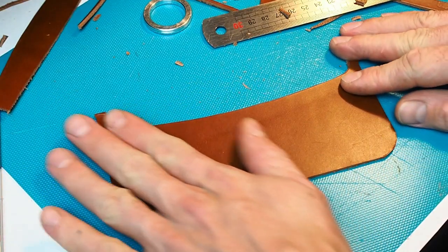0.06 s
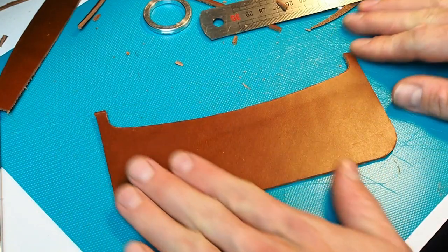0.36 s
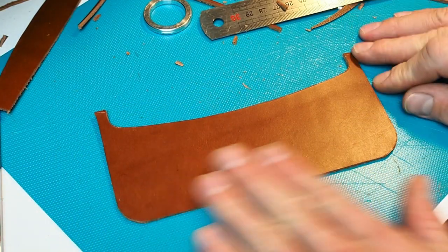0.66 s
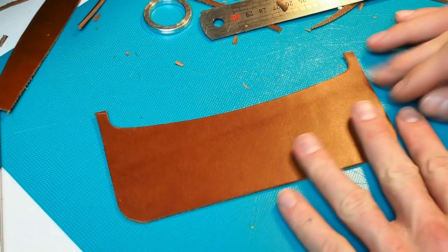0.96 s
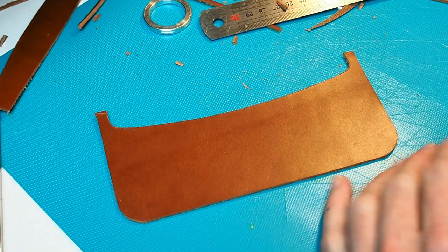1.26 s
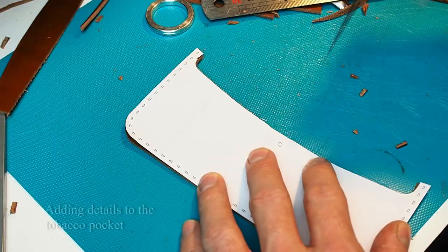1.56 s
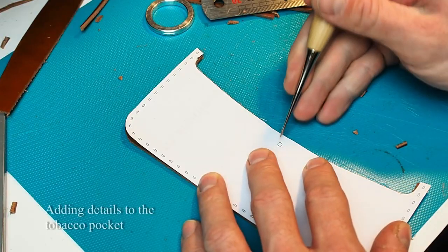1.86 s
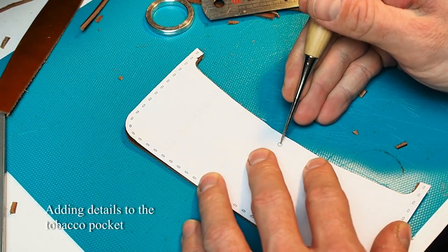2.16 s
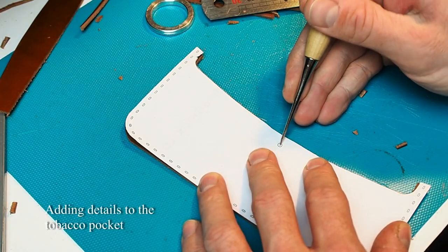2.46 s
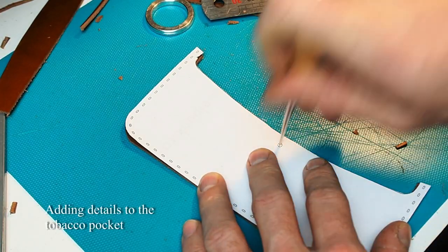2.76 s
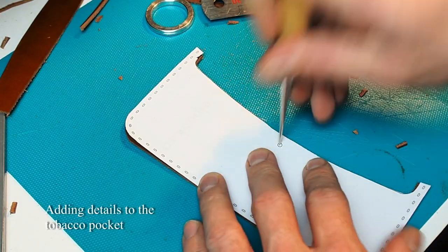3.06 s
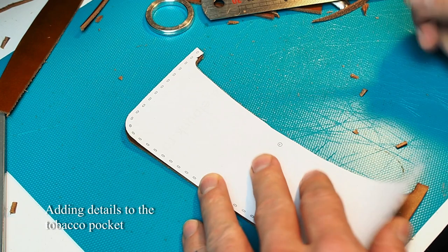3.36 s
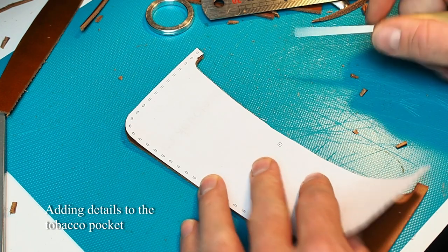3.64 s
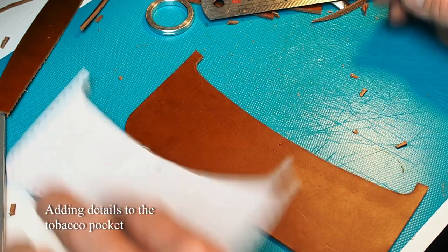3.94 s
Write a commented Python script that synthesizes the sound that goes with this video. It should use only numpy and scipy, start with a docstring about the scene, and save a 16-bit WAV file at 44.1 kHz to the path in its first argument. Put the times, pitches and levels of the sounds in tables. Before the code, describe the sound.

Soft brushing of palms on leather and paper, with small creaks and one sharp snap.

```python
"""A leatherwork bench in a quiet room, the microphone close to the cutting mat.
A palm smooths a piece of leather and slides off it, a hiss of friction and catching fibres.
An awl goes through a paper pattern in jerks that creak in the mat and thud in the table top,
and is pulled out. The paper is peeled off and swept away, and snaps once, sharply.
Fingers brush and edges tick in between, over a low room tone."""
import sys
import numpy as np
from scipy import signal
from scipy.fft import rfft, irfft, next_fast_len
from scipy.io import wavfile
from scipy.ndimage import uniform_filter1d, map_coordinates

SR = 44100
rng = np.random.default_rng(int(sys.argv[2]) if len(sys.argv) > 2 else 0)


def file_out(sig):
    """Save sig as 16-bit WAV at sys.argv[1]."""
    # one column per channel
    cols = np.atleast_2d(sig).T
    # limit, then scale
    lim = np.clip(cols, -1, 1)
    pcm = np.round(lim * 32767).astype(np.int16)
    wavfile.write(sys.argv[1], SR, pcm)


N = 176400
T = np.arange(N) / SR

# colour of skin rubbing leather: frequency_hz, density_db
LEATHER_COLOUR = [(150,-6),(380,-14),(750,-7),(1400,-6),(3000,1.5),(5900,-1),(7000,-15),(9000,-39)]
# colour of the bright top of any rub: frequency_hz, density_db
TREBLE_COLOUR = [(4000,-46),(6000,-9),(7500,0),(11500,-4),(13700,-2.5),(15500,-6.5)]
# modes of the awl creaking in the mat: pitch_hz, level_db, t60_s
CREAK_MODES = [(650,-5,0.028),(773,2,0.062),(930,-5,0.023),(1050,3.5,0.037)]
# modes of the table top: pitch_hz, level_db, t60_s
TABLE_MODES = [(87,-4,0.077),(133,0.5,0.11),(205,-8,0.06),(264,-2.5,0.054),(370,0.5,0.027)]
PALM_GRIT, PAPER_GRIT = 0.059, 0.39  # share of a rub's power that comes from catching fibres
TABLE_LOW_CUT_HZ = 102


def awl(db_per_octave=14):
    """Each slip of the point creaks at its own pitch and thuds in the table."""
    # the awl slipping deeper: start_s, creak_db, thud_db, creak_centre_hz
    slips = [(2.843,-23.5,-30,770),(2.853,-26.5,-25,1040),(2.889,-34.5,-32,1050),(2.913,-31.5,-38,1040),(2.969,-31.5,-44,970),(2.989,-28,-28.5,900),(3.017,-38,-39.5,1050),(3.081,-33,-38,740)]
    out = np.zeros((2, N))
    for start_s, creak_db, thud_db, centre_hz in slips:
        creak = sum(grate([mode]) for mode in excited(CREAK_MODES, centre_hz, db_per_octave))
        thud = sum(grate([mode]) for mode in TABLE_MODES)
        add(out, start_s, amp(creak_db) * creak + amp(thud_db) * thud)
    return out


def grate(modes, slip_t60_s=0.025, rise_s=0.0033):
    """One short, rough slip rings the modes with the energy of a single blow."""
    t = T[:SR // 4]
    body = ring(modes) * (1 - np.exp(-t / rise_s))  # the mat softens the start
    slip = radiated(rng.standard_normal(len(t)) * amp(-60 * t / slip_t60_s), TABLE_LOW_CUT_HZ)
    return unit(signal.fftconvolve(slip, body)[:len(t)]) * body.std()


def paper_snap(rise_s=0.00008, scatter_db=-12, scatter_t60_s=0.041, scatter_delay_s=0.000764):
    """The stiff paper gives one hard crack of a few cycles, scattered at once by the bench."""
    # modes of the snapping sheet: pitch_hz, level_db, t60_s
    sheet_modes = [(1550,-20,0.004),(3360,5.8,0.0025),(4340,-16,0.0064)]
    # colour of the scatter off the bench: frequency_hz, density_db
    scatter_colour = [(50,-32),(190,-8.5),(1400,-8.5),(2900,-1),(5500,-2.5),(15500,-19)]
    start_s = 3.8077
    out, t = np.zeros((2, N)), T[:SR // 10]
    add(out, start_s, ring(sheet_modes)[:len(t)] * (1 - np.exp(-t / rise_s)))
    scatter = stereo_noise(len(t), lambda hz: along(scatter_colour, hz))
    add(out, start_s + scatter_delay_s, amp(scatter_db - 60 * t / scatter_t60_s) * scatter)
    return radiated(out, low_hz=170)


def paper_slide(uneven_db=1.77):
    """The pattern scrapes and crinkles; the loose sheet flutters lower down."""
    # the pattern sliding and lifting: time_s, level_db, relative_treble_db, relative_flutter_db
    peel = [(3.368,-52,-4,-12),(3.374,-38,-11,-18.5),(3.422,-36,-3,-2.5),(3.433,-29.5,0,-12),(3.446,-43,3,-3.5),(3.495,-46.5,-10,-9),(3.703,-48.5,0.5,-7.5),(3.715,-42.5,6,-4),(3.765,-39.5,-1.5,-24),(3.797,-35.5,-8.5,-21),(3.83,-36,-7,-4.5),(3.893,-39,-2.5,-11.5),(3.908,-30.5,-9.5,-3),(3.928,-37.5,-3.5,-10),(3.948,-38.5,-11,-1),(4.0,-57,-2,-7)]
    # colour of the scraping sheet: frequency_hz, density_db
    scrape_colour = [(800,-26),(2300,-8),(3400,1),(5700,-2.5),(7000,-11.5),(9000,-26)]
    # colour of its flutter: frequency_hz, density_db
    flutter_colour = [(100,-19),(800,-3),(1700,1),(6000,-24)]
    level_db, treble_db, flutter_db = stroke(peel)
    scrape = rub(scrape_colour, PAPER_GRIT) + amp(treble_db) * rub(TREBLE_COLOUR, PAPER_GRIT)
    gain = amp(level_db + uneven_db * wobble(knots_per_s=160))
    return gain * (scrape + amp(flutter_db) * rub(flutter_colour, PAPER_GRIT))


def palm(uneven_db=1):
    """Skin slides over leather and mat, brighter as it speeds up."""
    # the palm's stroke: time_s, level_db, relative_treble_db
    smoothing = [(0,-60,-3),(.225,-44.5,-2),(.257,-37,-2),(.28,-38,0),(.301,-30,0.5),(.322,-38.5,-1),(.445,-58,-4.5),(.52,-50.5,-5),(.595,-40,-4),(.67,-46,-1.5),(.745,-47,3.5),(.96,-51,-3),(.995,-56.5,-4.5),(1.05,-52.5,-0.5),(1.35,-66,-6)]
    level_db, treble_db = stroke(smoothing)
    gain = amp(level_db + uneven_db * wobble(knots_per_s=69.5))
    return gain * (rub(LEATHER_COLOUR, PALM_GRIT) + amp(treble_db) * rub(TREBLE_COLOUR, PALM_GRIT))


def ticks(half_band_octaves=0.93):
    """Leather edge, awl point and paper catch and let go, each with a short dry burst."""
    # small catches: start_s, level_db, centre_hz, t60_s
    catches = [(0.4648,-37,2210,0.074),(2.5198,-37,4470,0.02),(2.5525,-32,8500,.014),(2.852,-37,2200,0.06),(3.46,-29,3200,0.054),(3.511,-41.5,4200,0.062),(3.7148,-25,4900,0.014)]
    out, t = np.zeros((2, N)), T[:SR // 10]
    for start_s, db, centre_hz, t60 in catches:
        colour = lambda hz: -10 * np.log10(1 + (np.log2((hz + 1) / centre_hz) / half_band_octaves) ** 4)
        add(out, start_s, amp(db - 60 * t / t60) * stereo_noise(len(t), colour))
    return out


def rasps():
    """Skin or steel grips the leather, and the friction sings in one narrow band."""
    # singing grips: peak_s, half_width_s, level_db, centre_hz, half_band_hz
    grips = [(0.257,0.01,-38,1750,900),(.7,.17,-50,2000,130),(.768,0.026,-50,5460,800),(0.956,0.018,-46.5,2950,350),(3.127,0.0075,-44,5980,450)]
    out = np.zeros((2, N))
    for peak_s, half_width_s, db, centre_hz, half_band_hz in grips:
        colour = lambda hz: -20 * np.log10(1 + ((hz - centre_hz) / half_band_hz) ** 2)
        out += swell(peak_s, half_width_s, db) * stereo_noise(N, colour)
    return out


def hands(db_per_octave=6):
    """Fingers brush lightly, and the hands' weight sets table and mat rumbling."""
    # light brushes of fingers and tool: peak_s, half_width_s, level_db
    brushes = [(1.588,0.051,-53.5),(1.86,0.036,-55),(2.585,0.041,-53),(3.115,0.065,-53)]
    # hands leaning on the table: peak_s, half_width_s, level_db, centre_hz
    leans = [(.29,0.11,-51,170),(1.425,0.024,-47,238),(1.625,0.027,-48,260),(2.56,0.075,-46.5,160),(2.735,0.048,-46,270),(2.96,0.17,-45.5,450),(3.461,0.058,-48,130),(3.722,0.023,-43,171),(3.821,0.025,-41,210)]
    friction = unit(rub(LEATHER_COLOUR, PALM_GRIT) + rub(TREBLE_COLOUR, PALM_GRIT))
    out = bench(sum(swell(*brush) for brush in brushes) * friction)
    for peak_s, half_width_s, db, centre_hz in leans:
        push = radiated(rng.standard_normal(N), TABLE_LOW_CUT_HZ)
        body = ring(excited(TABLE_MODES + CREAK_MODES, centre_hz, db_per_octave))
        out += swell(peak_s, half_width_s, db) * unit(signal.fftconvolve(push, body, "same"))
    return out


def rub(colour, grit=0, catches_per_s=1500):
    """Friction noise: a smooth hiss and a share of separate tiny catches."""
    catches = unit((rng.random(N) < catches_per_s / SR) * rng.laplace(size=(2, N)))
    hiss = rng.standard_normal((2, N))
    return spread(np.sqrt(1 - grit) * hiss + np.sqrt(grit) * catches, lambda hz: along(colour, hz))


def drift(pair, depth_db=1.2):
    """The colour of friction shifts as the contact moves: slow patches of gain in time and frequency."""
    spectra = signal.stft(pair, nperseg=512)[2]
    patches = uniform_filter1d(rng.standard_normal(spectra.shape[1:]), size=7, axis=0)
    patches = uniform_filter1d(patches, size=9, axis=1)
    return signal.istft(spectra * amp(depth_db * unit(patches)), nperseg=512)[1][:, :N]


def bench(x, t60_s=0.033, echo_db=-3):
    """Close reflections off the bench and its tools put a fine ripple on the colour of the rubbing."""
    t = T[:SR // 20]
    echo = stereo_noise(len(t), np.zeros_like) * amp(-60 * t / t60_s)
    return x + amp(echo_db) * signal.fftconvolve(x, echo / np.linalg.norm(echo[0]), axes=1)[:, :N]


def room(x, level_db=-14.5):
    """The small room's short answer, dying faster in the treble."""
    # room decay: frequency_hz, t60_s
    decay = [(150,0.44),(5000,.22),(14000,0.079)]
    hz, t, spectra = signal.stft(rng.standard_normal((2, SR // 2)), SR, nperseg=256)
    tail = signal.istft(spectra * amp(-60 * t / along(decay, hz)[:, None]), SR, nperseg=256)[1]
    return amp(level_db) * signal.fftconvolve(x, tail / np.linalg.norm(tail[0]), axes=1)[:, :N]


def room_tone(air_db=-51, waver_rad=0.29):
    """Steady air with a faint wavering hum."""
    # colour of the room's air: frequency_hz, density_db
    air_colour = [(25,-10),(44,4),(62,-3.5),(110,3.5),(380,-8.5),(550,-2),(1100,-9.5),(1900,-15),(3600,-12.5),(6000,-19),(14000,-25)]
    # tones of the hum: pitch_hz, level_db
    tones = [(98,-64),(266,-68.5),(801,-68.5)]
    hum = sum(amp(db) * unit(np.sin(2 * np.pi * hz * T + waver_rad * wobble(4.95))) for hz, db in tones)
    return amp(air_db) * rub(air_colour) + hum


def stroke(rows, fade_db_per_s=104):
    """A curve for each column after the time; the level fades before and after the rows."""
    times, *columns = np.transpose(rows)
    level_db, *others = [np.interp(T, times, column) for column in columns]
    outside_s = np.abs(T - np.clip(T, times[0], times[-1]))
    return [level_db - fade_db_per_s * outside_s] + others


def swell(peak_s, half_width_s, db):
    """A bell-shaped rise and fall."""
    return amp(db) * np.exp(-((T - peak_s) / half_width_s) ** 2)


def wobble(knots_per_s):
    """A smooth random curve."""
    return map_coordinates(rng.standard_normal(int(N * knots_per_s / SR) + 4), [T * knots_per_s])


def ring(modes):
    """Damped modes after one blow."""
    t = T[:SR // 4]
    return sum(amp(db - 60 * t / t60) * np.sin(2 * np.pi * hz * t) for hz, db, t60 in modes)


def excited(modes, centre_hz, db_per_octave):
    """The modes as one contact excites them: weaker the farther they lie from its centre."""
    return [(hz, db - db_per_octave * abs(np.log2(hz / centre_hz)), t60) for hz, db, t60 in modes]


def radiated(x, low_hz):
    """A vibrating surface gives off little bass below low_hz."""
    return signal.sosfilt(signal.butter(2, low_hz, "high", fs=SR, output="sos"), x)


def spread(pair, colour_db):
    """Two unrelated signals coloured into a stereo sound of rms 1."""
    # stereo image at the microphone: frequency_hz, left_right_correlation
    image = [(150,0.55),(1400,0.64),(2500,0.13),(5800,0.21),(6800,-0.07)]
    turn = lambda hz: np.arccos(along(image, hz)) / 2
    mid, side = filtered(pair, lambda hz: amp(colour_db(hz)) * [np.cos(turn(hz)), np.sin(turn(hz))])
    return unit(np.array([mid + side, mid - side]))


def stereo_noise(samples, colour_db):
    """Coloured noise of rms 1 in the stereo image."""
    return spread(rng.standard_normal((2, samples)), colour_db)


def filtered(x, response):
    """x through a gain that depends on frequency."""
    n = x.shape[-1]
    padded = next_fast_len(n + 4096)
    return irfft(rfft(x, padded) * response(np.fft.rfftfreq(padded, 1 / SR)), padded)[..., :n]


def along(points, hz):
    """A curve through (frequency_hz, value) points on a log frequency axis."""
    frequencies, values = np.transpose(points)
    return np.interp(np.log(hz + 1), np.log(frequencies + 1), values)


def add(track, start_s, sound):
    """Lay a sound into a stereo track."""
    part = track[:, round(start_s * SR):][:, :sound.shape[-1]]
    part += sound[..., :part.shape[1]]


def amp(db):
    """Decibels to gain."""
    return 10 ** (np.asarray(db) / 20)


def unit(x):
    """Scaled to rms 1."""
    return x / np.sqrt(np.mean(x ** 2) + 1e-20)


def scene():
    """Rubbing and blows up close; the blows' echo and the room tone behind."""
    blows = ticks() + awl() + paper_snap()
    rubbing = bench(drift(palm() + paper_slide()))
    return rubbing + hands() + rasps() + blows + room(blows) + room_tone()


def record(dry, top_hz=15800):
    """The microphone has narrow dips; full scale clips, and the band is limited."""
    # dips in the microphone's response: centre_hz, half_width_hz, depth_db
    dips = [(1617,51,9.5),(6500,286,7),(10460,640,9.5)]
    loss_db = lambda hz: sum(db * np.exp(-((hz - centre) / width) ** 2) for centre, width, db in dips)
    picked_up = filtered(dry, lambda hz: amp(-loss_db(hz)))
    return filtered(np.clip(picked_up, -1, 1), lambda hz: hz < top_hz)


dry = scene()
out = record(dry)
file_out(out)
```